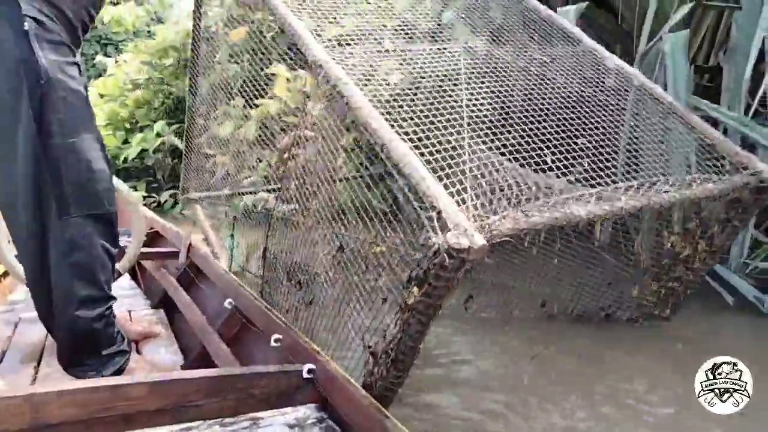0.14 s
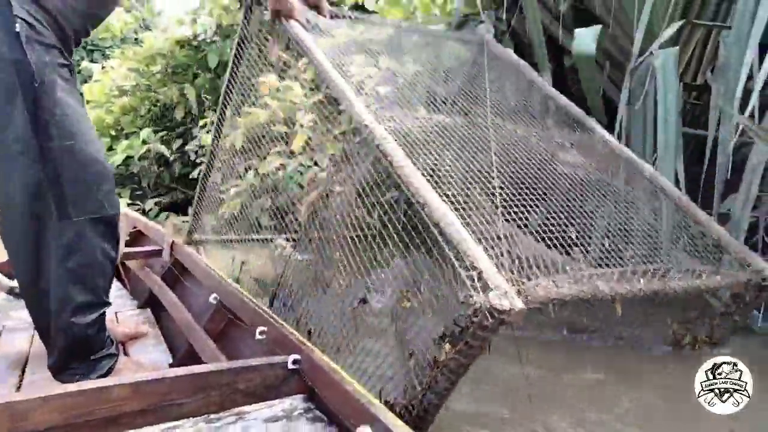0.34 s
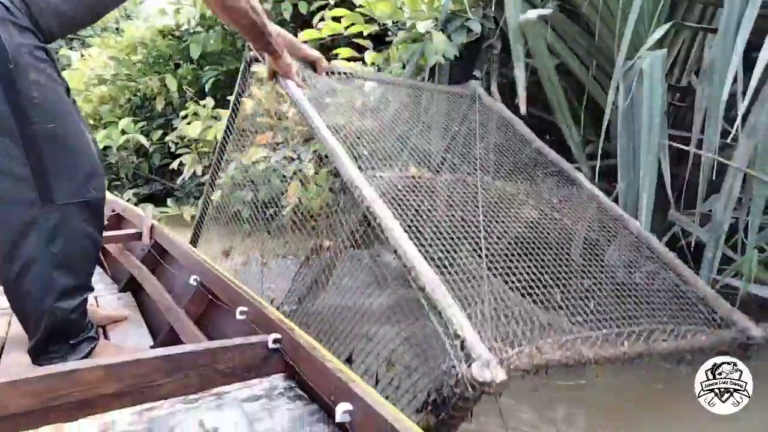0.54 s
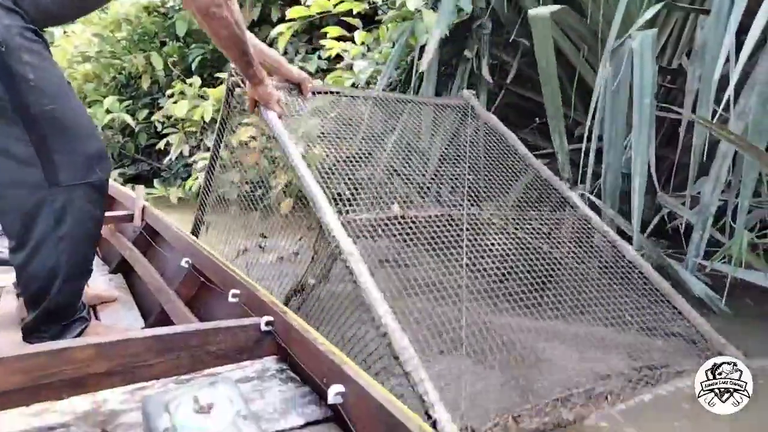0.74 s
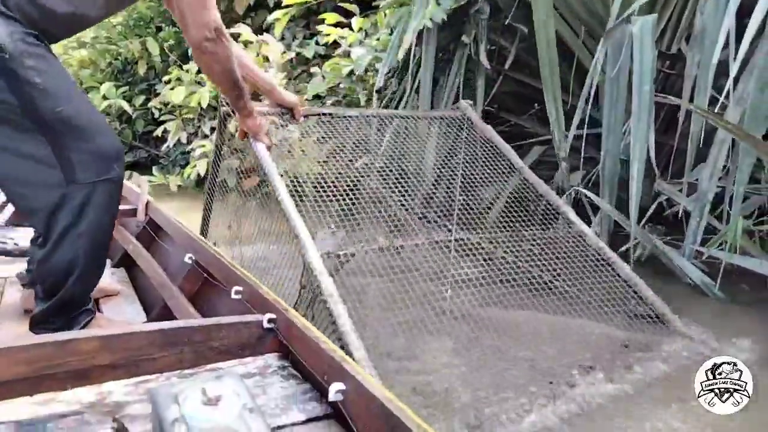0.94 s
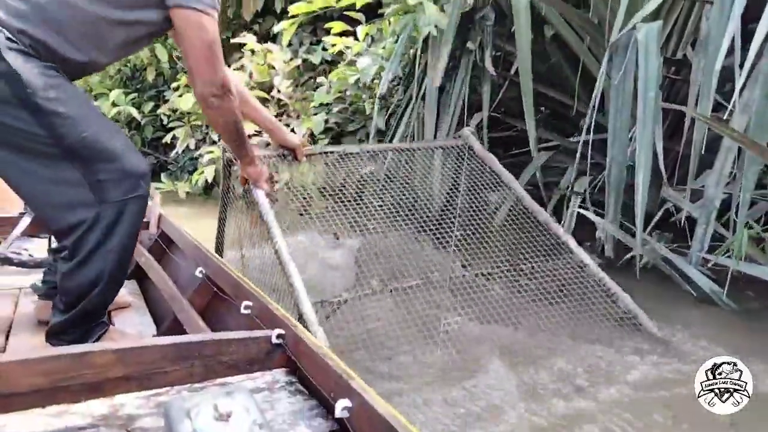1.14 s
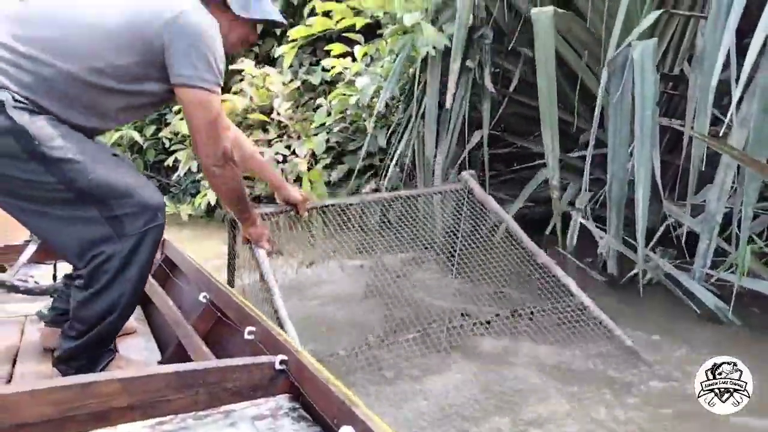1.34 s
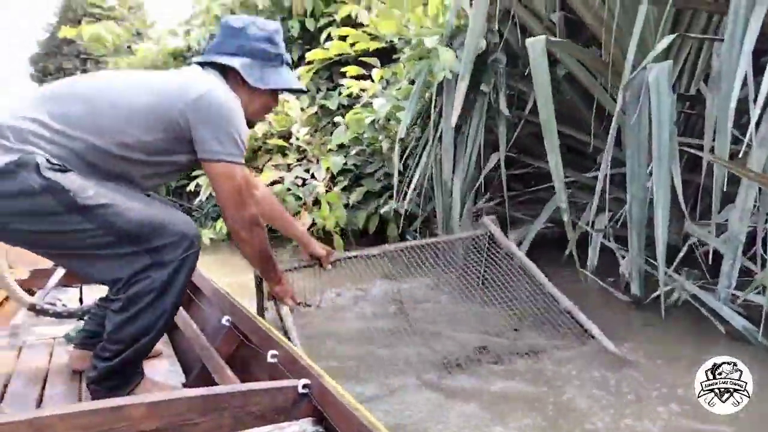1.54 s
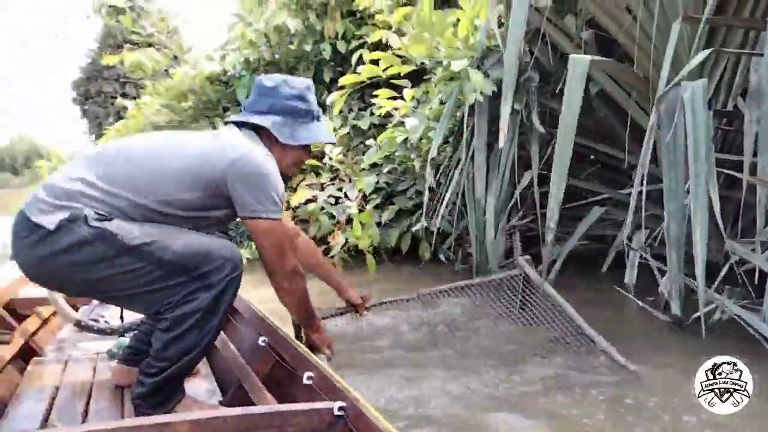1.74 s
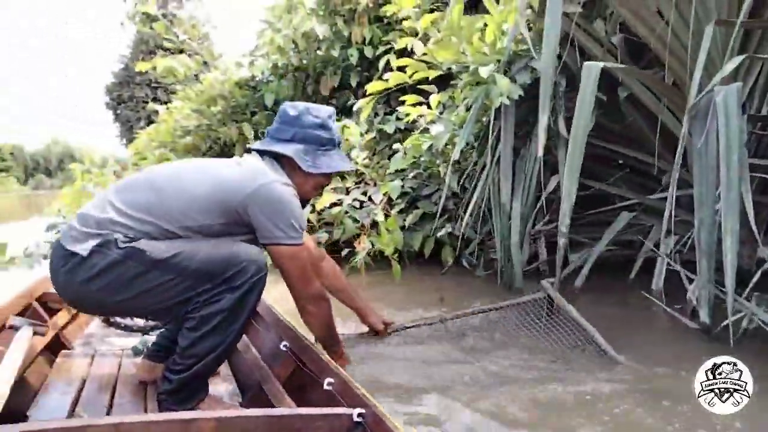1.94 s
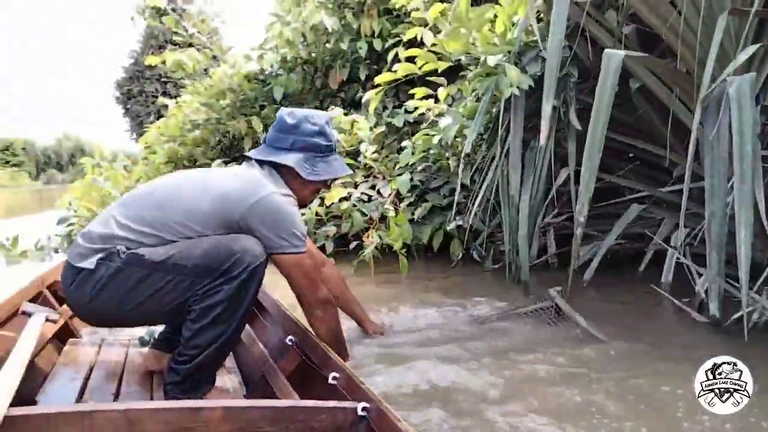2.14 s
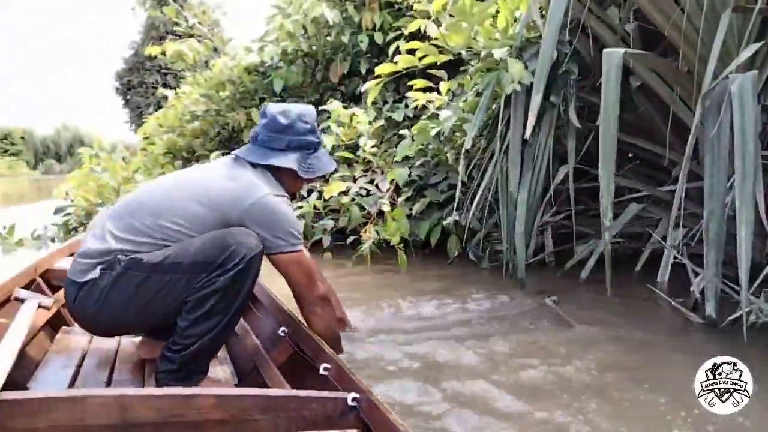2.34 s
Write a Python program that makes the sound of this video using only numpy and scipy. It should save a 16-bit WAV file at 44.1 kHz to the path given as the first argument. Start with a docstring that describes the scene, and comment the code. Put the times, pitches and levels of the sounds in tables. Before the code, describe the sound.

Water splashes and gurgles as a mesh trap slides into a river, then sharp drops splat close to the microphone and thin into scattered drips. The wooden boat thuds softly over faint river noise.

```python
"""Fish trap tipped into a river

From a wooden boat, a wire-mesh trap goes over the side. Water sheets off the mesh in a fizz of spray and
gurgles round the frame, where trapped air rings as bubbles. Single drops splat close to the
microphone. Now and then the hull's planks thud, over a low bed of air and river noise."""
import sys
import numpy as np
from scipy import signal
from scipy.fft import rfft, irfft
from scipy.io import wavfile
from scipy.ndimage import uniform_filter1d

SR = 44100
rng = np.random.default_rng(int(sys.argv[2]) if len(sys.argv) > 2 else 0)


def to_wav(s):
    """Save 16-bit WAV."""
    ch = np.atleast_2d(s).T  # columns
    pcm = np.round(np.clip(ch, -1, 1) * 32767)  # PCM
    wavfile.write(sys.argv[1], SR, pcm.astype(np.int16))


N = 105840  # 2.4 s

# Microphone colour peaking near 9 kHz, plus a sharp treble cut above 15.5 kHz:
# (frequency [Hz], gain [dB])
MIC_AND_CUT = [(20, -11), (4000, -15), (5600, -18), (7300, -10.5), (8500, -1), (9200, 1), (9900, -4),
               (10800, -10), (12500, -12), (15480, -12), (15600, -32), (16600, -54)]
MIC_BASS_DB = MIC_AND_CUT[0][1]


def amp(db):
    return 10 ** (np.asarray(db) / 20)


def unit_rms(x):
    return x / np.sqrt(np.mean(x ** 2) + 1e-20)


def db_at(spectrum, hz):
    freqs, db = np.transpose(spectrum)
    return np.interp(np.log(hz + 1), np.log(freqs + 1), db)


def add(mix, start_s, sound):
    part = mix[round(start_s * SR):][:len(sound)]
    part += sound[:len(part)]


def colour(x, spectrum):
    """Shapes a sound by a spectrum table, with nothing below its first row; unit RMS."""
    hz = np.fft.rfftfreq(len(x), 1 / SR)
    gain = amp(db_at(spectrum, hz)) * (hz >= spectrum[0][0])
    return unit_rms(irfft(rfft(x) * gain, len(x)))


def wash(window, patchy_db, flicker_db):
    """White noise whose short-time spectrum has drifting patches and wide-band flicker."""
    frames = 4 * N // window + 5
    real, imag, patches = rng.standard_normal((frames, window // 2 + 1, 3)).T
    patches = uniform_filter1d(patches, size=5, axis=0)
    patches = unit_rms(uniform_filter1d(patches, size=12, axis=1))
    flicker = unit_rms(uniform_filter1d(rng.standard_normal(frames), size=5))
    spectra = (real + 1j * imag) * amp(patchy_db * patches + flicker_db * flicker)
    return unit_rms(signal.istft(spectra, nperseg=window, noverlap=window * 3 // 4)[1][:N])


def blip(hz, t60, rise_oct, attack_s):
    """A damped, gliding tone; a bubble's pitch rises as it nears the surface."""
    t = np.arange(0, t60, 1 / SR)
    envelope = (1 - np.exp(-t / attack_s)) ** 2 * amp(-60 * t / t60)
    pitch = hz * 2 ** (rise_oct * t / t60)
    return envelope / envelope.max() * np.sin(2 * np.pi * np.cumsum(pitch) / SR)


def bubble_swarm(per_s, spread_db, band_hz, cycles, rise_oct, pitches=16):
    """Small bubbles of many sizes ringing at random times; a few are loud."""
    strength = amp(spread_db * np.minimum(rng.exponential(1, N), 4))
    onsets = strength * (rng.random(N) < per_s / SR)
    pitch_index, out = rng.integers(0, pitches, N), np.zeros(N)
    for k, hz in enumerate(np.geomspace(*band_hz, pitches)):
        ring = blip(hz, cycles / hz, rise_oct, attack_s=0.29 / hz)
        out += signal.oaconvolve(onsets * (pitch_index == k), ring)[:N]
    return unit_rms(out)


def runoff(layer):
    """Gain of the "fizz" or the "gurgle" as the water off the mesh swells and ebbs."""
    # Water leaving the trap: (time [s], relative fizz level [dB], relative gurgle level [dB])
    flow = [(0.0, -60, -61), (0.13, -55.5, -68), (0.28, -44.5, -60.5), (0.41, -39.5, -49.5),
            (0.5, -35, -47), (0.61, -41, -45.5), (0.77, -41.5, -56), (1.02, -49, -61.5), (1.13, -54, -63),
            (1.59, -55.5, -78), (1.78, -57, -85), (1.98, -52, -70), (2.08, -52, -69), (2.19, -60.5, -96),
            (2.4, -60, -65)]
    times, fizz_db, gurgle_db = np.transpose(flow)
    return amp(np.interp(np.arange(N) / SR, times, fizz_db if layer == "fizz" else gurgle_db))


def river_rumble(level_db=-65):
    """Low air and river noise all round the boat, with a faint hiss on top."""
    # Open-air bed: (frequency [Hz], relative level [dB])
    spectrum = [(8.8, -39), (15, -18), (70, 1.5), (250, -16), (340, -20), (540, -21), (681, -20),
                (764, -38), (1500, -18), (1950, -90), (3300, -120)]
    noise = wash(window=1024, patchy_db=1.2, flicker_db=0.6)
    return amp(level_db - MIC_BASS_DB) * colour(noise, spectrum + [(4000, -29.5)])


def hull_thuds(rattle_hz=460, rattle_width_hz=930, rattle_peak_s=0.0097):
    """Soft blows ring the planks, each at its own spot, with a short dull rattle."""
    # Blows on the hull: (time [s], level [dB], pitch of the struck spot [ratio], rattle level [dB])
    blows = [(.084, -56.5, 0.89, -84), (.49, -51.5, 1.6, -51.5), (0.556, -44, 1.01, -58),
             (0.611, -60, 0.97, -51), (.655, -44, 1.11, -53.5), (0.714, -44, .95, -82),
             (.744, -42, 1.27, -75), (1.038, -43.5, 1.02, -65), (1.626, -55, 0.58, -85),
             (1.801, -50.5, 0.65, -51.5), (1.924, -63, 0.74, -72), (2.06, -54.5, .75, -58),
             (2.128, -60.5, 0.36, -87), (2.365, -56, 0.51, -58.5)]
    # Plank modes at a pitch ratio of 1: (frequency [Hz], relative level [dB], t60 [s])
    plank_modes = [(95, -8, .12), (143, 0, .2), (195, -3, .13), (270, -8, .07)]
    out, t = np.zeros(N), np.arange(0, 6 * rattle_peak_s, 1 / SR)
    radius = np.exp(-np.pi * rattle_width_hz / SR)
    resonator = [1, -2 * radius * np.cos(2 * np.pi * rattle_hz / SR), radius ** 2]
    envelope = t / rattle_peak_s * np.exp(1 - t / rattle_peak_s)
    for start, db, spot, rattle_db in blows:
        for hz, mode_db, t60 in plank_modes:
            add(out, start, amp(db + mode_db) * blip(hz * spot, t60, rise_oct=-0.031, attack_s=0.0019))
        rattle = unit_rms(signal.lfilter([1], resonator, rng.standard_normal(len(t))))
        add(out, start, amp(rattle_db) * rattle * envelope)
    return out / amp(MIC_BASS_DB)


def frame_gurgle(gain_db=-1):
    """Water folding round the frame: a wash full of air pockets."""
    # Churning water: (frequency [Hz], relative level [dB])
    spectrum = [(88, 2.5), (150, -9), (211, -22), (279, -14), (583, -6), (720, -6.5), (1290, -7),
                (1590, -10.5), (3500, -15), (4550, -2), (7700, -120)]
    treble_floor = [(6000, -61)]
    pockets = bubble_swarm(per_s=900, spread_db=0.83, band_hz=(293.7, 3150), cycles=21, rise_oct=0.47)
    churn = wash(window=512, patchy_db=3.5, flicker_db=-2.5) + amp(-6) * pockets
    return runoff("gurgle") * amp(gain_db - MIC_BASS_DB) * colour(churn, spectrum + treble_floor)


def bubbles(gulp_hz=400, roughness=0.2):
    """Single air pockets that ring clearly, a little shaken by the water round them."""
    # Bubbles by the boat: (time [s], peak [dB], pitch [Hz], glide before limiting [octaves], t60 [s])
    pockets = [(0.019, -57.5, 1015, 3.9, 0.075), (.096, -58, 300, -1, 0.11),
               (0.496, -44, 1080, -2.5, 0.056), (0.509, -44, 1322, -2.5, 0.084),
               (.602, -43, 1327, .03, 0.05), (0.624, -45, 1073, 0.4, 0.068),
               (.639, -44.5, 718, -0.7, 0.068), (1.885, -58.5, 946, 1.6, 0.045),
               (1.941, -57, 595, 2.5, 0.012), (2.032, -58, 2375, -.05, 0.073),
               (2.053, -56, 2840, .01, 0.029), (2.118, -59.5, 865, 1.5, 0.047),
               (0.225, -48.5, 1250, .05, 0.033), (0.241, -50.5, 1027, 2.2, 0.067),
               (0.243, -45, 1330, 0.5, 0.015), (0.534, -50, 2525, -3, 0.096), (.602, -35, 756, -2, 0.0098),
               (.715, -44, 693, -2, 0.065), (.757, -49.5, 295, 7, 0.22), (.855, -46, 672, 0.47, 0.032),
               (0.88, -46.5, 2260, 0.4, .06), (.98, -47, 860, 0.4, 0.015), (1.015, -50, 826, .05, 0.05),
               (1.079, -60.5, 1844, .02, 0.08), (1.424, -62, 2900, 4, 0.069),
               (1.464, -59, 3780, .01, 0.071), (1.476, -62, 3630, 2, 0.097), (1.493, -64, 3970, .02, 0.056),
               (1.62, -63, 1060, .03, .06), (1.734, -63.5, 1470, .03, 0.13),
               (2.063, -50.5, 1487, -.03, 0.11), (2.078, -46.5, 1404, 1, 0.04), (2.298, -60, 770, .1, .04)]
    out = np.zeros(N)
    for start, db, hz, rise_oct, t60 in pockets:
        if hz > gulp_hz:  # small pockets hardly glide
            rise_oct = np.clip(rise_oct, -120 / hz, 120 / hz)
        add(out, start, amp(db - db_at(MIC_AND_CUT, hz)) * blip(hz, t60, rise_oct, attack_s=0.00094))
    shake = unit_rms(uniform_filter1d(uniform_filter1d(rng.standard_normal(N), size=120), size=120))
    return out * (1 + roughness * shake)


def mesh_fizz(gain_db=10.5):
    """Fine spray off the mesh and countless droplets bursting on the river."""
    # Bright hiss of the spray: (frequency [Hz], relative level [dB])
    spectrum = [(1500, -1.5), (2500, -0.5), (4000, -3), (6000, 0), (8000, -2), (11000, 1.5), (15000, 3)]
    sheet = wash(window=256, patchy_db=2.8, flicker_db=0.88)
    droplets = bubble_swarm(per_s=830, spread_db=4.5, band_hz=(3360, 15100), cycles=12.5, rise_oct=0.096)
    spray = amp(10.5) * sheet + amp(-0.5) * droplets
    return runoff("fizz") * amp(gain_db) * colour(spray, [(700, -3.5)] + spectrum)


def close_drops(slap_ratio=0.46, slap_db=-9.5, spray_rise_s=0.00077, spray_t60=0.095):
    """Each drop by the microphone is a sharp tick, a lower slap and a patter of spray that dies away."""
    # Drops: (time [s], tick peak [dB], pitch [Hz], ring length [1.2 cycles], relative spray level [dB])
    splats = [(0.0066, -39, 14200, 9.3, -62), (0.0094, -48.8, 10914, 4.5, -54),
              (0.0207, -52, 12811, 6.2, -78), (0.0553, -36.5, 8400, 6.3, -57),
              (0.0574, -39, 10923, 3.9, -65), (0.0836, -46, 8800, 6.3, -42), (0.1208, -39, 11400, 10, -45),
              (0.2143, -36, 11200, 20, -58), (0.2365, -28.9, 8500, 22, -51), (0.2395, -27.5, 8600, 22, -49),
              (0.462, -22.8, 12194, 11, -29.5), (0.7069, -14, 9453, 3.3, -53.1),
              (0.7288, -16.5, 9400, 4.6, -53.2), (0.7375, -14.5, 8300, 2.5, -48),
              (0.7519, -11.5, 7870, 3.5, -40), (0.7596, -13.5, 9300, 4.2, -60),
              (0.7615, -22, 9331, 5.7, -58), (0.7666, -14.5, 13400, 6.2, -30),
              (0.7669, -13, 8116, 5.2, -60), (0.7729, -20, 8867, 4.9, -55), (0.8046, -22, 12773, 11, -46),
              (0.813, -16, 9550, 5.1, -35), (0.8159, -26, 9900, 5.6, -49), (0.8219, -11.5, 10660, 3.7, -60),
              (0.825, -33, 9022, 4.8, -57), (0.8317, -34, 8800, 3.8, -33.5),
              (0.864, -30.7, 12198, 6.3, -49), (0.867, -22, 14554, 8.7, -29),
              (0.8835, -25.5, 6100, 1.8, -44), (0.9271, -32.5, 10513, 12.0, -58),
              (0.9709, -39, 4650, 3.4, -66), (0.9752, -35, 8000, 8.1, -62), (0.9778, -26, 12600, 6.1, -41),
              (0.9857, -25, 8360, 11.5, -64), (0.9933, -41, 8568, 4.4, -44.5),
              (1.0925, -50, 11011, 7.8, -64.6), (1.1047, -37, 8200, 3.9, -64.4),
              (1.1397, -30, 9453, 4.7, -57), (1.1448, -36, 13870, 6.7, -70), (1.2249, -36.5, 8600, 18, -71),
              (1.516, -42.0, 14423, 11.6, -51.9), (1.519, -34, 14700, 9.3, -48),
              (1.6795, -38, 9800, 9.3, -63), (1.7053, -39, 9050, 10, -50), (1.79, -38, 8509, 7.6, -73),
              (1.8246, -27.2, 10400, 6.2, -49), (1.827, -29, 12300, 6, -39.5),
              (1.8291, -34, 12900, 9.2, -34.5), (1.8346, -28, 10118, 7.2, -60),
              (1.8394, -30, 12986, 6.5, -46), (1.8643, -23.5, 9700, 9.4, -35.5),
              (1.943, -27, 7670, 5.3, -63), (1.9437, -29.5, 9800, 17, -59), (1.9464, -29, 10000, 11.0, -49),
              (1.9531, -29, 9500, 13, -61), (1.9578, -27, 8599, 7.4, -66), (1.958, -38.3, 7914, 8.5, -70),
              (1.971, -24.5, 8660, 5.4, -67), (1.9744, -22, 8300, 4.4, -70),
              (2.0243, -38.5, 8200, 8.6, -51.5), (2.0266, -29.5, 8800, 11, -44),
              (2.0757, -25, 8806, 7.5, -48), (2.0784, -26, 8400, 7.9, -51), (2.1114, -20, 12400, 2.8, -41),
              (2.1144, -24, 9400, 6.1, -37.5), (2.1178, -21, 5730, 8.2, -50), (2.12, -33, 6500, 7.6, -74),
              (2.1229, -56, 5340, 4.7, -67), (2.124, -37.7, 6390, 9.4, -77), (2.127, -38, 6000, 6.4, -85),
              (2.131, -41, 6600, 9.4, -79), (2.1364, -42, 5681, 9.4, -77),
              (2.2322, -27.5, 8600, 7.7, -44.5), (2.238, -40, 11300, 9.3, -61),
              (2.239, -39, 10060, 5.8, -65.7), (2.2955, -40, 12600, 6.7, -46.5),
              (2.297, -39, 12307, 6.3, -53), (2.306, -40, 9900, 3.3, -72), (2.307, -42, 7000, 3.3, -61)]
    impacts, bright_gain, dull_gain = np.zeros((3, N))
    t = np.arange(0, spray_t60, 1 / SR)
    envelope = amp(-60 * t / spray_t60) * (1 - np.exp(-t / spray_rise_s))
    for start, db, hz, ring, spray_db in splats:
        tick = blip(hz, t60=1.2 * ring / hz, rise_oct=0.055, attack_s=0.33 * ring / hz)
        add(impacts, start, amp(db - db_at(MIC_AND_CUT, hz)) * tick)
        slap_hz = hz * slap_ratio
        slap = blip(slap_hz, t60=10 / slap_hz, rise_oct=0.11, attack_s=0.5 / slap_hz)
        add(impacts, start, amp(db + slap_db) * slap)
        add(bright_gain, start, amp(spray_db) * envelope)
        dull_db = spray_db - 24 * np.log2(hz / 8000)  # big, low drops throw a duller spray
        add(dull_gain, start, amp(dull_db) * envelope)
    patter = bubble_swarm(per_s=2500, spread_db=3.5, band_hz=(2190, 17800), cycles=4.7, rise_oct=0.13)
    patter += 0.8 * wash(window=128, patchy_db=1.5, flicker_db=3.0)
    bright = colour(patter, [(5000, -20), (7500, -4), (10000, 0.5), (15000, 4.5)])
    dull = colour(patter, [(1200, -9), (3000, -8.5), (6000, 7), (8500, -11)])
    return impacts + amp(4) * bright_gain * bright + amp(2.5) * dull_gain * dull


def reed_echo(sound, level_db=-17, t60=0.099):
    """The reeds scatter back a short, faint tail."""
    tail = rng.standard_normal(4000) * amp(-60 * np.arange(4000) / SR / t60)
    return amp(level_db) * signal.oaconvolve(sound, tail / np.linalg.norm(tail))[:N]


def scene():
    """Mono, from the boat: the close sounds and their echo over the running water."""
    near = close_drops() + bubbles() + hull_thuds()
    return (near + reed_echo(near) + mesh_fizz() + frame_gurgle() + river_rumble())[None]


def record(dry):
    """Microphone colour peaking near 9 kHz, a sharp treble cut above 15.5 kHz, then a steep low-pass."""
    log_gain = np.log(amp(db_at(MIC_AND_CUT, np.abs(np.fft.fftfreq(4096, 1 / SR)))))
    minimum_phase = -signal.hilbert(log_gain).imag
    taps = np.fft.ifft(np.exp(log_gain + 1j * minimum_phase)).real[:2048]
    heard = signal.oaconvolve(dry, taps[None])[:, :N]
    low_pass = signal.firwin(511, cutoff=16640, window=("kaiser", 9), fs=SR)
    return signal.oaconvolve(heard, low_pass[None], "same")


dry = scene()
out = record(dry)
to_wav(out)
```